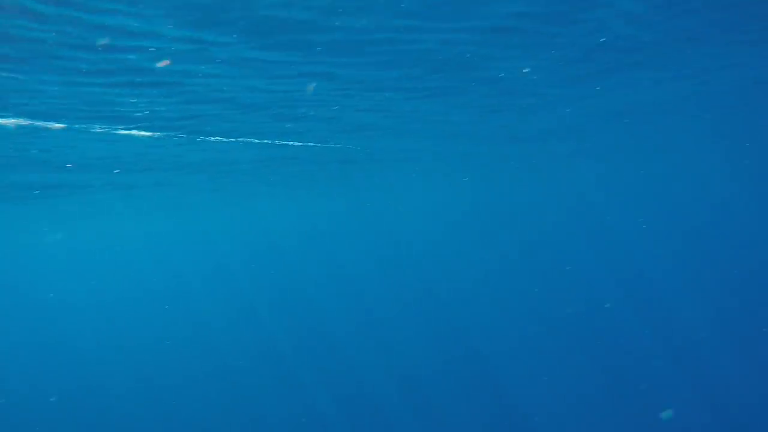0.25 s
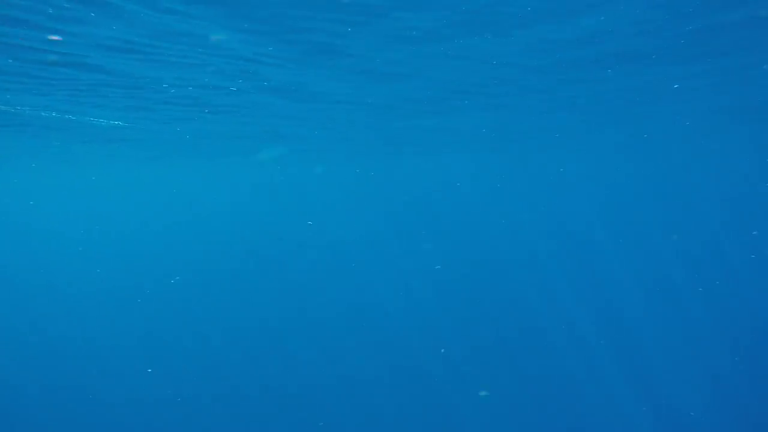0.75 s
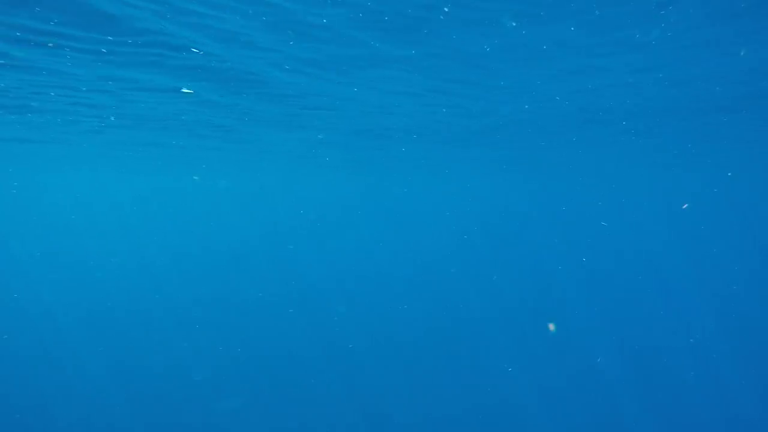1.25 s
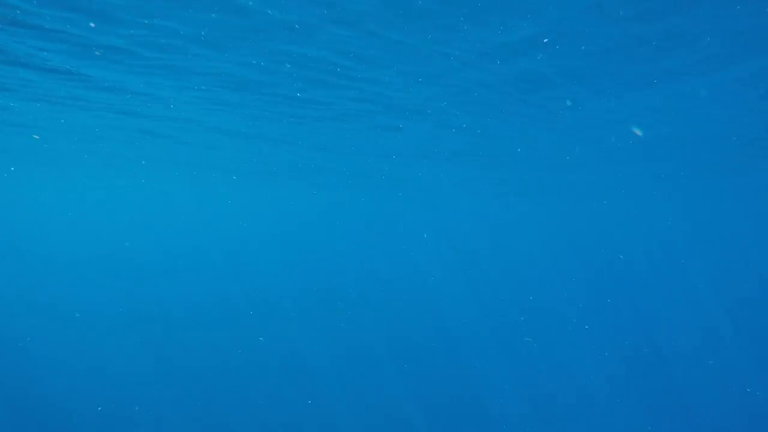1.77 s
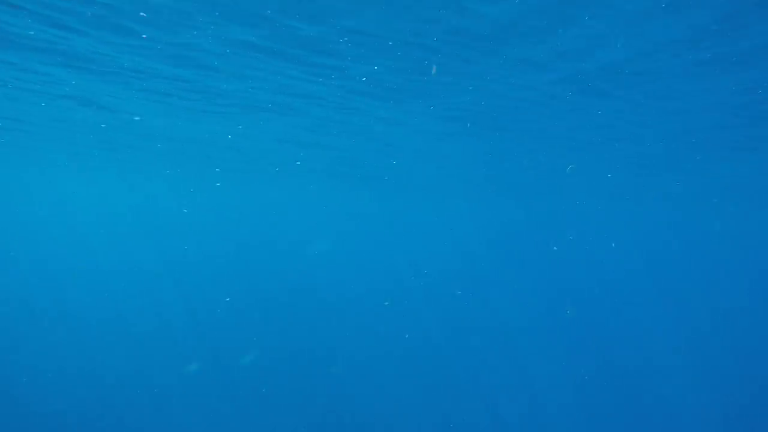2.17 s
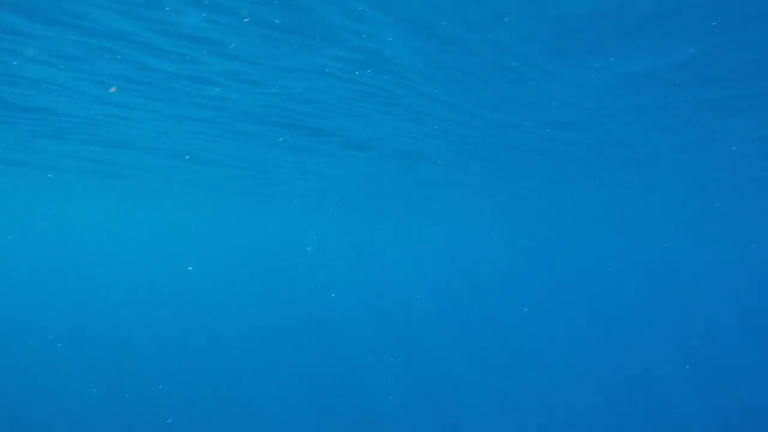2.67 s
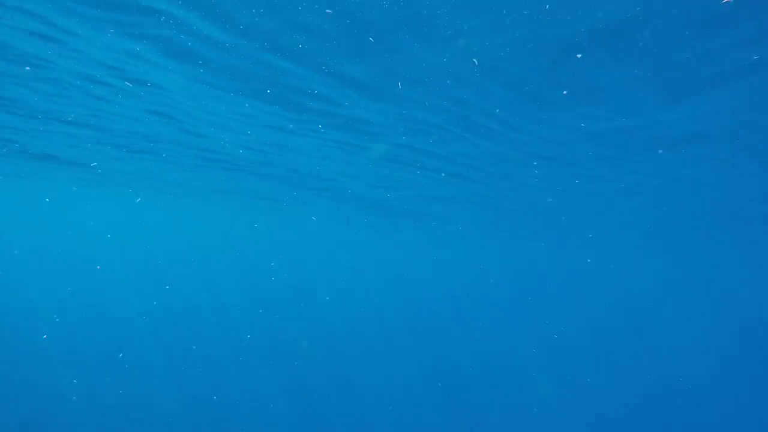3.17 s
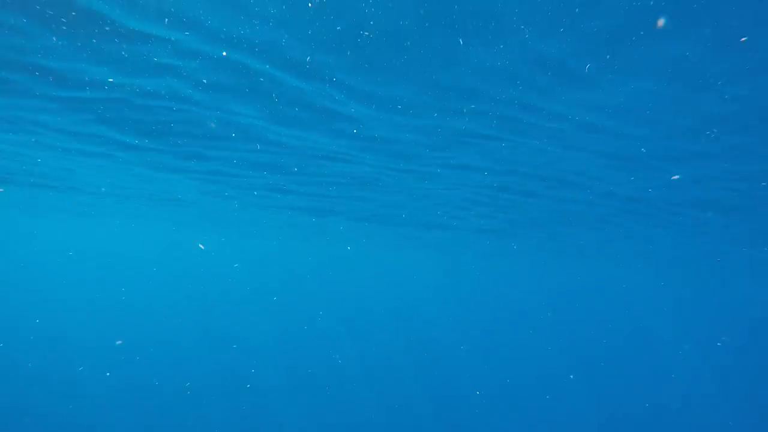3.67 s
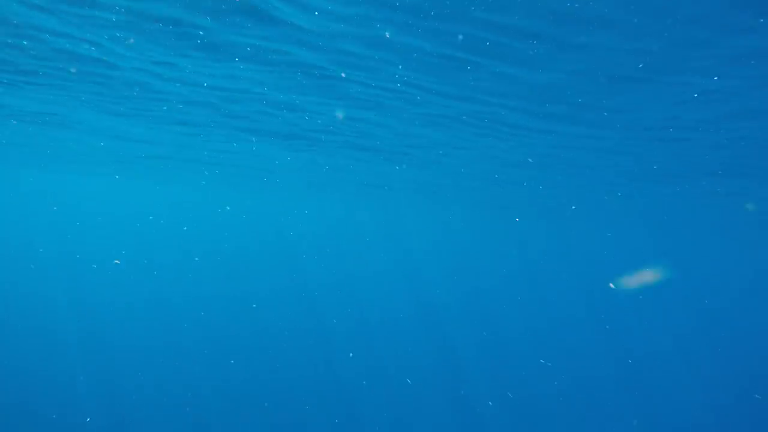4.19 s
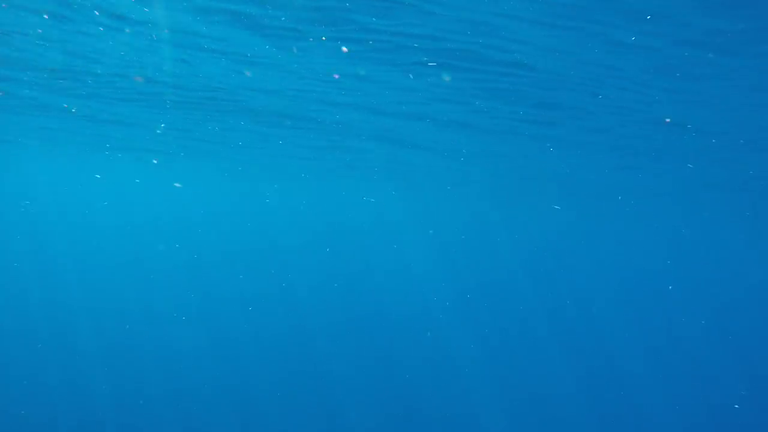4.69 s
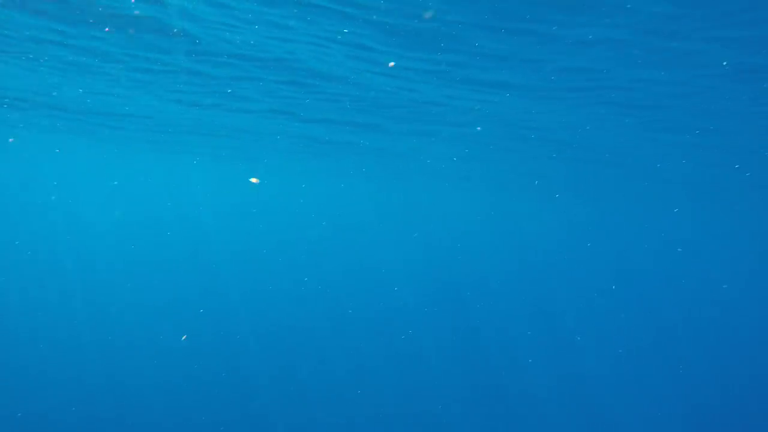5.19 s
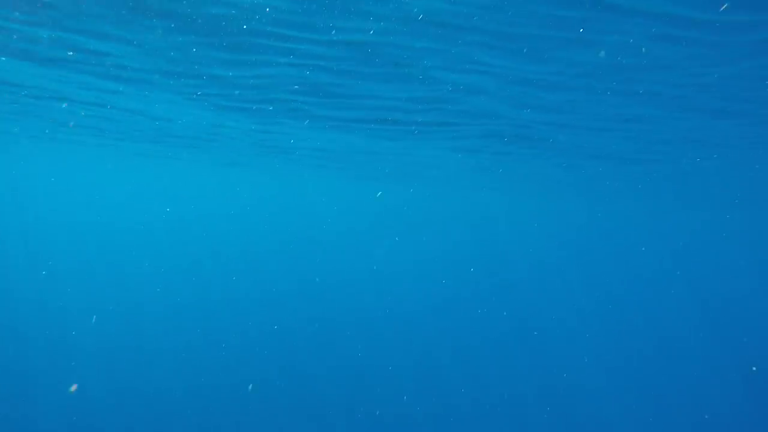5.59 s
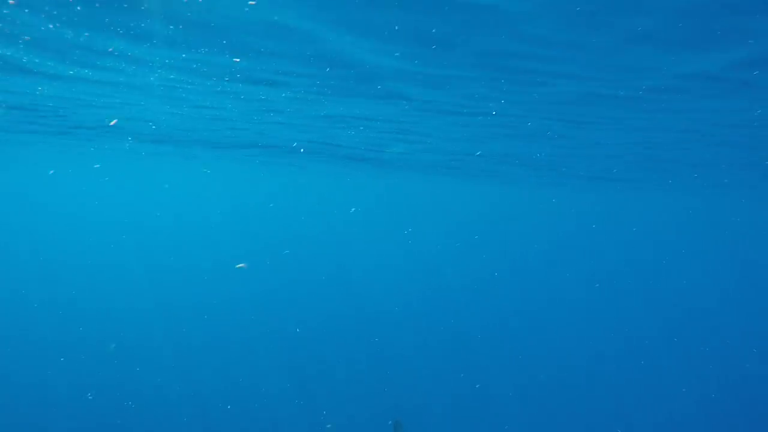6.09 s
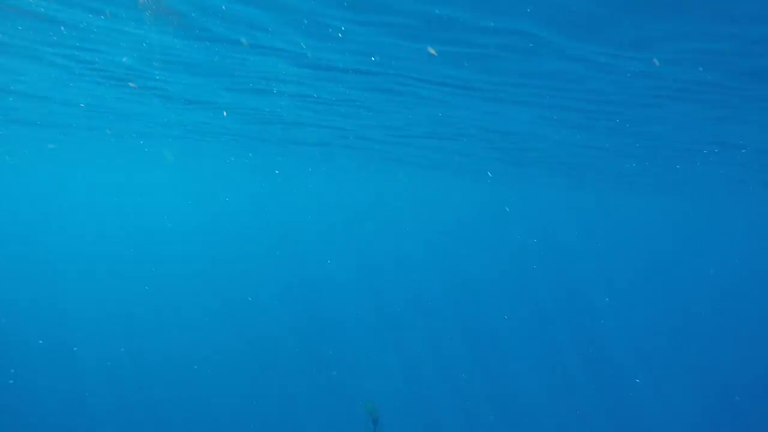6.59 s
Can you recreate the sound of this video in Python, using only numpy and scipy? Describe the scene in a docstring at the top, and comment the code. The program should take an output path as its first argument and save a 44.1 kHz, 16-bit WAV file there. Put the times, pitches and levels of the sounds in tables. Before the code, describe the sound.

A boat engine idles underwater with a steady low hum and rumble, scattered knocks on the camera housing and faint ticks.

```python
"""A boat engine idles, heard under water from a small camera housing that rumbles in the flow.
The engine's cycle comes through the hull as a comb of steady tones over resonant noise and clatter.
The housing's modes ring with scattered knocks, and a joint creaks once. There are short gliding gurgles
and one longer wavering hum; one soft wash of water passes, and faint ticks crackle over a thin hiss."""
import sys
import numpy as np
from scipy import signal
from scipy.fft import rfft, irfft, next_fast_len
from scipy.io import wavfile
from scipy.ndimage import uniform_filter1d

SR = 44100
rng = np.random.default_rng(int(sys.argv[2]) if len(sys.argv) > 2 else 0)


def generate_wav(signal):
    """Clip the signal to [-1, 1] and save it as 16-bit WAV at the path in sys.argv[1]."""
    frames = np.transpose(np.atleast_2d(signal))
    scaled = np.clip(frames, -1, 1) * 32767
    pcm = np.round(scaled).astype(np.int16)
    wavfile.write(sys.argv[1], SR, pcm)


N = 302085


def from_db(db):
    """Decibels to gain."""
    return 10 ** (np.asarray(db) / 20)


def rms_one(x):
    """Scale to rms 1."""
    return x / np.sqrt(np.mean(x ** 2) + 1e-20)


def automation(rows):
    """One curve over all samples for each column after time_s."""
    time_s, *columns = np.transpose(rows)
    return [np.interp(np.arange(N) / SR, time_s, column) for column in columns]


def drift(rate_hz):
    """Smooth random wander of spread 1."""
    hop, run_in = 100, 1500
    pole = np.exp(-2 * np.pi * rate_hz * hop / SR)
    slow = signal.lfilter([1], [1, -2 * pole, pole * pole], rng.standard_normal(N // hop + run_in + 2))
    slow = slow[run_in:]
    return np.interp(np.arange(N) / hop, np.arange(len(slow)), rms_one(slow - slow.mean()))


def coloured(spectrum, flicker_db, rate_hz, bands):
    """Noise of a given spectrum, in overlapping bands that flicker partly together; rms 1."""
    size = next_fast_len(N)
    hz, db = np.transpose(spectrum)
    octave = np.log2(np.arange(1, size // 2 + 2) * SR / size)
    noise = rfft(rng.standard_normal(size)) * from_db(np.interp(octave, np.log2(hz), db, -200, -200))
    centres, step = np.linspace(np.log2(hz[0]), np.log2(hz[-1]), bands, retstep=True)
    out, together = np.zeros(N), drift(rate_hz)
    for centre in centres:
        band = irfft(noise * np.clip(1 - abs(octave - centre) / step, 0, 1), size)[:N]
        out += band * from_db(flicker_db * (0.62 * together + drift(rate_hz)))
    return rms_one(out)


def evened(x, window_s):
    """Level out the slow swells of a noise, so that a curve can set them."""
    window = int(window_s * SR)
    power = uniform_filter1d(uniform_filter1d(x ** 2, window), window)
    return x / np.sqrt(power + 0.028)


def ring(drive, hz, t60_s, rise_s):
    """One struck mode: a decaying sine with a softened attack."""
    pole, angle = from_db(-60 / (t60_s * SR)), 2 * np.pi * hz / SR
    attack = 1 - np.exp(-(np.arange(len(drive)) / (rise_s * SR)) ** 2)
    feedback = [1, -2 * pole * np.cos(angle), pole * pole]
    return attack * signal.lfilter([0, np.sin(angle)], feedback, drive + 1e-18)


# Colour of the water's hiss: frequency_hz, density_db
HISS_COLOUR = [(2600, 1), (3200, -3.5), (3900, -0.5), (5000, -2), (6300, -5.5), (8000, -7), (10500, -8),
               (13000, -12), (14800, -21), (15100, -26), (15800, -30)]


def hiss():
    """A thin, flickering bed of water hiss."""
    return from_db(-67) * coloured(HISS_COLOUR, flicker_db=1.4, rate_hz=10.4, bands=5)


def tick(centre_hz, width_hz, grain):
    """A snap with a short rough tail, ringing around one pitch over a dry wide crack; peak 1."""
    edges_hz = np.clip([centre_hz - width_hz / 2, centre_hz + width_hz / 2], 1500, 15500)
    band = signal.butter(1, edges_hz, "band", fs=SR)
    burst = 0.22 * grain * np.exp(-np.arange(len(grain)) / (0.0011 * SR))
    burst[0] = np.sign(grain[0])
    ringing = signal.lfilter(*band, signal.lfilter(*band, burst))
    crack = signal.lfilter([1, 0, -1], [1, -.65], burst)
    snap = ringing / abs(ringing).max() + 0.25 * crack
    return snap / abs(snap).max()


# The clearer ticks in the water; the rows at 4.8137 s and 6.6545 s are the sharp treble crack of the housing
# knocks at those times: start_s, peak_db, centre_hz, width_hz
TICK_CUES = [(.14, -47, 3900, 2000), (0.3207, -42.5, 4570, 1500), (.3666, -45, 7000, 5000),
             (0.38, -31, 3830, 1300), (0.441, -50, 7300, 1500), (0.4534, -46, 3900, 1200),
             (.5153, -52, 5000, 3000), (0.5388, -42, 3400, 2200), (0.543, -40, 4840, 2400),
             (0.576, -44, 4280, 2000), (.655, -50, 5000, 3000), (.874, -49, 3600, 1200),
             (0.9866, -40, 5000, 4000), (1.0086, -37.5, 4370, 1400), (1.09, -30.5, 9550, 13000),
             (1.278, -50, 8500, 3000), (1.3244, -48, 5000, 3000), (1.342, -39, 4000, 4500),
             (1.366, -41, 4200, 900), (1.3665, -43, 6500, 1200), (1.4452, -49, 5540, 3000),
             (1.5594, -42, 4700, 2500), (1.7006, -44, 5200, 3500), (1.7097, -39, 5000, 4000),
             (1.7514, -43, 6000, 5000), (1.8559, -44.5, 5830, 2500), (2.0169, -44, 4500, 2500),
             (2.225, -48, 5500, 3000), (2.281, -48, 5000, 3000), (2.384, -43, 4840, 2400),
             (2.436, -51, 4200, 2000), (2.492, -45.5, 5230, 2600), (2.637, -49, 6500, 5000),
             (2.6582, -34.5, 6340, 900), (2.727, -47, 7300, 5000), (2.744, -49, 2600, 1300),
             (2.777, -51, 6200, 2000), (2.852, -43, 5000, 3000), (3.0217, -43.5, 5900, 3000),
             (3.06, -48, 4500, 2500), (3.215, -43, 3760, 1900), (3.2693, -40.5, 4200, 3500),
             (3.4485, -43, 5160, 2600), (3.4918, -40.5, 3730, 1900), (3.658, -48, 5630, 2500),
             (3.7892, -40.5, 5500, 5000), (3.8208, -46, 3800, 2000), (3.868, -44, 8000, 4000),
             (4.139, -43.5, 6300, 3000), (4.166, -49, 7000, 4000), (4.185, -48, 4000, 2500),
             (4.203, -49, 8000, 4000), (4.6155, -49, 7350, 2500), (4.634, -39.5, 7040, 3500),
             (4.8137, -51, 5500, 5000), (4.885, -49, 5030, 3000), (5.027, -51, 5100, 1500),
             (5.0485, -49, 5000, 1500), (5.149, -53, 5800, 1200), (5.2, -50, 7000, 7000),
             (5.357, -52, 7600, 1800), (5.504, -33, 5100, 3000), (5.626, -34.5, 6350, 4000),
             (5.6835, -50, 4200, 2000), (5.797, -46, 5850, 2900), (5.816, -32, 4250, 2620),
             (5.834, -45, 4500, 2200), (5.842, -48, 4500, 2200), (6.0068, -52, 4220, 2000),
             (6.13, -44.5, 5560, 2800), (6.2776, -46, 7000, 3500), (6.349, -53, 3500, 1700),
             (6.378, -44, 5160, 3000), (6.4465, -46, 7200, 3600), (6.5597, -47.5, 5700, 1000),
             (6.634, -47, 5000, 6000), (6.6545, -41, 6560, 8000), (6.7002, -50, 6560, 5000),
             (6.826, -53, 8050, 2500)]


def crackle(faint_per_s=80, floor_db=-57.5, clumping=1.6):
    """Cued ticks among a random scatter of faint ones that come in clumps."""
    draws = rng.random((1200, 4))
    gaps = (-np.log(draws[:, 0])) ** clumping
    starts_s = np.cumsum(gaps / gaps.mean() / faint_per_s)
    faint = [(start_s, floor_db - 5.7 * np.log(1 - .92 * loud), 3200 * 2 ** (2.08 * high),
              2500 + 6000 * wide)
             for start_s, (loud, high, wide) in zip(starts_s, draws[:, 1:]) if start_s < N / SR]
    grains = rng.standard_normal((len(TICK_CUES) + len(draws), 400))
    out = np.zeros(N + 400)
    for (start_s, peak_db, centre_hz, width_hz), grain in zip(TICK_CUES + faint, grains):
        at = int(start_s * SR)
        out[at:at + len(grain)] += from_db(peak_db) * tick(centre_hz, width_hz, grain)
    return out[:N]


# Colour of the rushing water: frequency_hz, density_db
RUSH_COLOUR = [(950, -28), (1150, -5), (1350, 2), (1600, -5), (2000, -22)]


def wash(start_s=5.13, length_s=0.59, fade_s=.07, level_db=-62.5):
    """Water washes over the housing: rushing noise fades in, holds and fades out."""
    t = np.arange(N) / SR - start_s
    gate = np.clip(np.minimum(t, length_s - t) / fade_s, 0, 1)
    return gate * from_db(level_db) * coloured(RUSH_COLOUR, flicker_db=2.0, rate_hz=8.4, bands=3)


# Three short gurgles and one longer hum: start_s, length_s, from_hz, to_hz, level_db
GLIDE_CUES = [(1.49, 0.09, 600, 720, -46), (3.05, .75, 588, 612, -46), (5.86, 0.035, 593, 583, -42),
              (5.969, 0.13, 668, 590, -41.5)]


def gurgles_and_hum():
    """Short gliding gurgles, and one longer wavering hum that swells near 600 Hz."""
    tremolo, vibrato = from_db(2.5 * drift(54.0)), 1 + .025 * drift(40.0)
    out = np.zeros(N)
    for start_s, length_s, from_hz, to_hz, level_db in GLIDE_CUES:
        at, length = int(start_s * SR), int(length_s * SR)
        pitch_hz = np.linspace(from_hz, to_hz, length) * vibrato[at:at + length]
        phase = 2 * np.pi * np.cumsum(pitch_hz) / SR
        out[at:at + length] += from_db(level_db) * np.hanning(length) * np.sin(phase)
    return out * tremolo


# Resonances of the creaking joint: pitch_hz, glide_hz (times the root of the slip count), level_db,
# loss_db (times the slip count cubed), t60_s, rise_s
CREAK_MODES = [(1150, 60, -26.5, 0.33, 0.03, .003), (1900, -3, -35, 0.25, 0.022, .0006),
               (1600, 0, -28, .3, .007, .0009), (2250, -40, -22.5, .3, 0.007, .0009),
               (2750, 0, -33, .4, .014, .001), (3180, -310, -25.5, .3, .012, .0012),
               (3900, -100, -48, .2, 0.011, .001)]


def creak(start_s=1.579, slip_gap_s=.0098, trim_db=1.5):
    """Five fading slips, each ringing resonances that shift as the joint gives way."""
    out, click = np.zeros(N), signal.unit_impulse(SR // 10)
    for slip in range(5):
        at = int((start_s + slip * slip_gap_s) * SR)
        for pitch_hz, glide_hz, level_db, loss_db, t60_s, rise_s in CREAK_MODES:
            hz = (pitch_hz + np.sqrt(slip) * glide_hz) * (1 + .01 * rng.normal())
            gain = from_db(trim_db + level_db - loss_db * slip ** 3 + rng.normal())
            out[at:at + len(click)] += gain * ring(click, hz, t60_s, rise_s)
    return out


# Modes of the housing; those under 500 Hz are the whole body's thud: pitch_hz, gain_db, base_t60_s
HOUSING_MODES = [(101, 0.5, 0.087), (180, -2, 0.071), (260, -0.5, 0.13), (362, 4, 0.085), (670, 27, 0.034),
                 (828, 7.5, 0.075), (990, 12, 0.044), (1140, 4.5, 0.051), (1250, 12, 0.034),
                 (1400, 3.5, 0.043), (1540, 6, 0.045), (1700, 16.5, 0.02), (1950, 7, 0.046),
                 (2350, 10, 0.026), (2800, 8, 0.025), (2940, -1.5, 0.039), (3840, 13.5, 0.017)]
# Knocks on the housing: start_s, level_db, centre_hz, spread_octaves, thud_db, singing_hz
KNOCK_CUES = [(0.436, -34, 180, 0.27, -34, 180), (.537, -40, 1250, 0.2, -49, 1250),
              (0.644, -40.5, 260, 0.4, -33.5, 260), (1.0897, -49, 2270, 0.32, -59, 1950),
              (1.163, -29, 1516, 0.26, -35, 1700), (1.5585, -48, 2000, 0.62, -50, 1950),
              (1.677, -32.5, 740, 0.31, -21.5, 670), (1.7394, -27, 1450, 0.27, -29, 1540),
              (1.752, -36.5, 1190, 0.3, -62, 1400), (1.824, -55, 2200, .23, -59, 2350),
              (1.949, -46.5, 1400, 0.2, -52, 1540), (2.055, -50, 1750, .2, -51, 1700),
              (2.658, -49, 2040, 0.9, -32.5, 670), (3.250, -52, 1840, .47, -64, 1700),
              (4.013, -48.5, 1870, .51, -53, 1950), (4.372, -48, 1890, 0.53, -33.5, 1950),
              (4.549, -50, 1200, 0.67, -41, 990), (4.8141, -35, 2000, 0.98, -26, 1950),
              (5.199, -52.5, 2350, 0.19, -38, 2350), (6.349, -50.5, 2320, 0.46, -60, 2350),
              (6.6333, -43, 2110, 0.3, -32, 2350), (6.654, -32, 1630, 0.66, -18.5, 1140)]


def knocks(sing_db=11, thud_lag_s=0.0017, rattle_s=.009):
    """A knock rings the modes near its centre, then thuds the body; pitches shift with the grip."""
    out, click = np.zeros(N + SR // 2), signal.unit_impulse(SR // 6)
    variations = rng.normal(0, 1, (len(KNOCK_CUES), len(HOUSING_MODES), 2))
    rattle_fade = np.exp(-np.arange(len(click)) / (rattle_s * SR))
    rattles = rng.standard_normal((len(KNOCK_CUES), len(click))) * rattle_fade
    for cue, variation, rattle in zip(KNOCK_CUES, variations, rattles):
        start_s, level_db, centre_hz, spread, thud_db, singing_hz = cue
        rise_s = 0.00085 * (.45 / spread) ** 0.46   # water cushions it; soft contacts excite fewer modes
        sustain = 0.95 * (centre_hz / 1500) ** -0.21 * 2 ** (-1.38 * spread)   # high or broad is drier
        rattling_click = click + .01 * spread ** 2 * rattle   # broad knocks shake loose fittings
        singer = np.argmin([abs(hz - singing_hz) for hz, *_ in HOUSING_MODES])
        for mode, (hz, gain_db, t60_s) in enumerate(HOUSING_MODES):
            accent, detune = variation[mode]
            if hz < 500:
                at, drive, blow_db = int((start_s + thud_lag_s) * SR), -click, thud_db
            else:
                at, drive = int(start_s * SR), rattling_click
                blow_db = level_db - 6 * (np.log2(hz / centre_hz) / spread) ** 2
            mode_db = level_db + sing_db if mode == singer else blow_db + gain_db + 1.2 * accent
            ringing = ring(drive, hz * (1 + .012 * detune), t60_s * sustain, rise_s)
            out[at:at + len(click)] += from_db(mode_db) * ringing
    return out[:N]


# Fader moves of the flow's two rumbles: time_s, deep_db, upper_db
FLOW_FADERS = [(0.02, -13, -32.5), (0.15, -20.5, -49), (0.19, -29, -24), (0.25, -18.5, -37),
               (1.42, -25, -44), (1.67, -23, -35), (2.45, -27, -44), (3.38, -23.5, -33.5),
               (3.41, -27, -32.5), (3.55, -18, -33.5), (3.7, -25.5, -46), (3.75, -32.5, -39),
               (3.85, -20, -43.5), (4.06, -24.5, -27.5), (4.17, -21, -46), (4.48, -28, -36.5),
               (4.63, -18.5, -40), (5.73, -30.5, -40), (5.86, -23.5, -52), (6.15, -34, -43.5),
               (6.2, -25.5, -64), (6.68, -31, -34), (6.7, -22.5, -54), (6.83, -39, -51)]
# Colours of the deep and the upper rumble: frequency_hz, density_db
DEEP_COLOUR = [(7, -32), (12, -22.5), (18, 1.5), (24, 0), (40, -5), (57, -5.5), (64, -18), (70, -14.5),
               (80, -68)]
UPPER_COLOUR = [(58, -19), (68, 2), (82, -3), (97, 5.5), (110, -10.5), (128, -33), (150, -74)]


def flow(deep_trim_db=2.0, upper_trim_db=0.8):
    """Eddies press on the housing: two layers of lumpy rumble."""
    deep_db, upper_db = automation(FLOW_FADERS)
    deep = evened(coloured(DEEP_COLOUR, flicker_db=2.1, rate_hz=2.6, bands=3), window_s=0.063)
    upper = evened(coloured(UPPER_COLOUR, flicker_db=4.0, rate_hz=7.9, bands=2), window_s=0.037)
    lumpy_deep = rms_one(deep * from_db(2 * drift(8.7)))
    lumpy_upper = rms_one(upper * from_db(3 * drift(10.2)))
    return from_db(deep_db + deep_trim_db) * lumpy_deep + from_db(upper_db + upper_trim_db) * lumpy_upper


# Colour of the engine's clatter: frequency_hz, density_db
CLATTER_COLOUR = [(440, -13), (750, 2), (1010, -11.5), (1120, -6), (1160, 0), (1290, -9), (1550, -4),
                  (1820, -2), (1980, -4.5), (2340, -6.5), (2830, -17), (3050, -18), (3960, -29),
                  (6710, -120)]


def clatter(cycle_phase, sway_db):
    """Midrange noise that pulses with four uneven firings a cycle."""
    throb_db = 1.5 * np.cos(4 * cycle_phase - 1.9) + .8 * np.cos(cycle_phase - 3.3)
    noise = coloured(CLATTER_COLOUR, flicker_db=1.0, rate_hz=16.0, bands=5)
    return from_db(-59 + 0.59 * sway_db + throb_db) * noise


# Resonances of the hull: frequency_hz, density_db
HULL_COLOUR = [(68, 6), (115, -13.5), (140, -3.5), (189, -4), (259, -5), (372, -3.5), (410, 0.5),
               (448, -5.5), (477, 1), (512, -10), (590, -5.5), (782, -31), (950, -49), (1240, -82),
               (2090, -120)]


def hull_drone(sway_db):
    """Engine noise resonating in the hull."""
    return from_db(-43 + 0.84 * sway_db) * coloured(HULL_COLOUR, flicker_db=2.0, rate_hz=9.4, bands=6)


# The engine's comb of tones: order (multiple of the cycle rate), level_db
ENGINE_ORDERS = [(4, -30.5), (7, -52.5), (8, -52.7), (9, -58.3), (10, -60.3), (11, -61.2), (12, -52.3),
                 (13, -53.8), (14, -61.4), (15, -59.4), (20, -62.3), (21, -58.3), (22, -63.4), (23, -60.1),
                 (24, -55.6), (25, -56.4), (27, -55.7), (28, -43.8), (29, -51.0), (30, -48.2), (31, -45.8),
                 (32, -61.2), (33, -71.8), (34, -64.0), (35, -58.1), (36, -55.9), (37, -63.7), (38, -54.9),
                 (39, -56.3), (40, -60.2), (41, -61.5), (43, -63.6), (44, -64.1), (45, -65.1), (46, -71.5),
                 (47, -73.8), (48, -71.2)]


def engine_tones(cycle_phase, firing_db, sway_db, upper_db, high_db):
    """Tones start together at a blow in the cycle; paths through hull and water scatter and sway them."""
    out = np.zeros(N)
    for order, level_db in ENGINE_ORDERS:
        if order < 33:
            blow_at = .13   # share of the cycle
            fader_db = firing_db if order < 6 else sway_db if order < 30 else sway_db + upper_db
        else:
            blow_at, fader_db = .78, high_db   # the high tones carry a second blow
        scatter_rad = (2.5 if order < 27 else .9) * rng.normal()
        phase = order * (cycle_phase - 2 * np.pi * blow_at) + scatter_rad + 0.32 * drift(2.17)
        out += np.sqrt(2) * from_db(level_db + fader_db + 1.93 * drift(1.41)) * np.cos(phase)
    return out


# Fader moves on the engine as the housing sways:
# time_s, firing_tone_db, high_tones_db, upper_hull_tones_db, hull_band_db
ENGINE_FADERS = [(0.0, 1, -2.5, 1.5, -40), (0.6, 1.5, -2.5, -2.5, -39), (0.92, -1, 1.5, 4, -39.5),
                 (1.15, 6.5, -1.5, -0.5, -39), (1.4, 2.5, 2.5, -2, -41), (2.1, 1.5, -0.5, 3, -41),
                 (2.45, 1, 0.5, 0.5, -42), (2.8, -1, -4, 1.5, -42.5), (3.05, -0.5, 0, -5.5, -42),
                 (3.35, -0.5, -2.5, 2, -42.5), (3.8, 0, 0.5, -14, -43), (4.2, 2, -5, 0, -44.5),
                 (4.6, -4.5, -2.5, -4.5, -42), (5.06, -2.5, -2, 2, -41.5), (5.51, 0.5, -3, -2.5, -41.5),
                 (5.89, -1.5, 1.5, -3.5, -42), (6.2, -14, -3.5, -3, -48), (6.56, -1, -2.5, -2, -45.5),
                 (6.85, 0.5, 0, 1, -41.5)]


def engine(cycle_hz=15.1, hunt_hz=.042, hunt_period_s=2.8, fastest_s=2.88):
    """The idle comes through the hull as tones, drone and clatter; the governor slowly hunts."""
    firing_db, high_db, upper_db, hull_db = automation(ENGINE_FADERS)
    sway_db = hull_db - hull_db.mean()
    t = np.arange(N) / SR
    speed_hz = cycle_hz + hunt_hz * np.cos(2 * np.pi * (t - fastest_s) / hunt_period_s)
    cycle_phase = 2 * np.pi * np.cumsum(speed_hz) / SR
    tones = engine_tones(cycle_phase, firing_db, sway_db, upper_db, high_db)
    return tones + hull_drone(sway_db) + clatter(cycle_phase, sway_db)


def scene():
    """All sources reach the one microphone."""
    mix = engine() + flow() + wash() + knocks() + creak() + gurgles_and_hum() + crackle() + hiss()
    return mix[None]


def record(dry):
    """A steep high cut, 70 dB down from 16.3 kHz."""
    return signal.sosfilt(signal.cheby2(12, 70, 16300, fs=SR, output="sos"), dry)


dry = scene()
out = record(dry)
generate_wav(out)
```